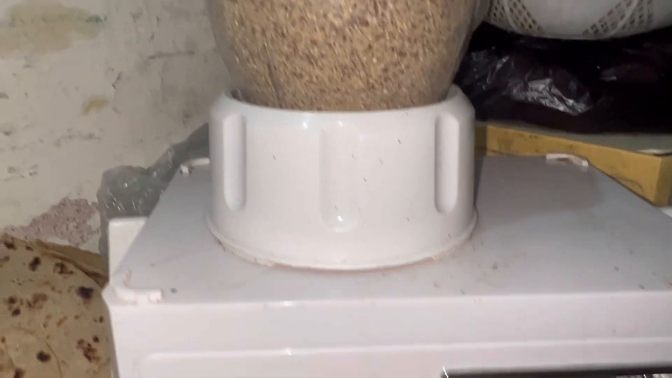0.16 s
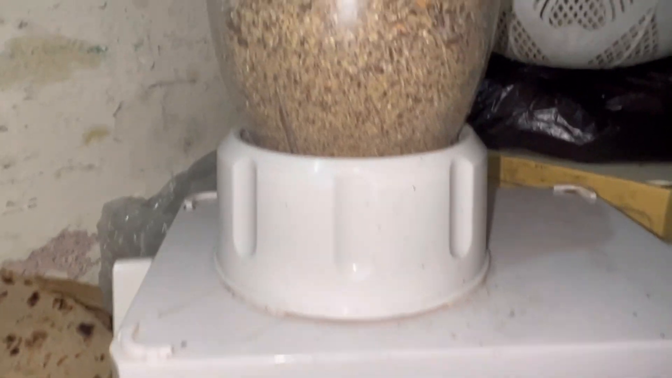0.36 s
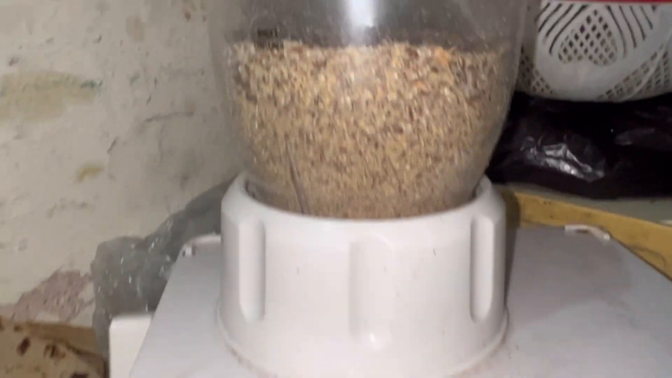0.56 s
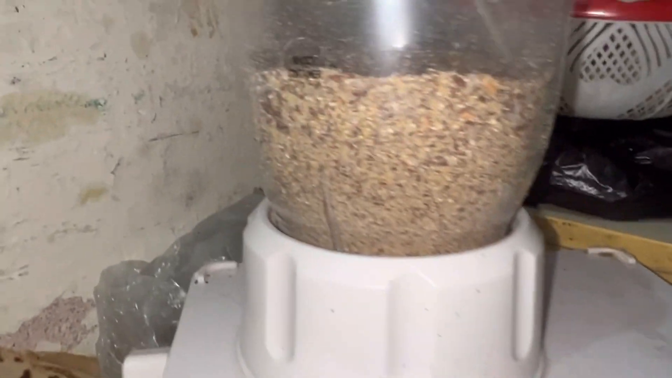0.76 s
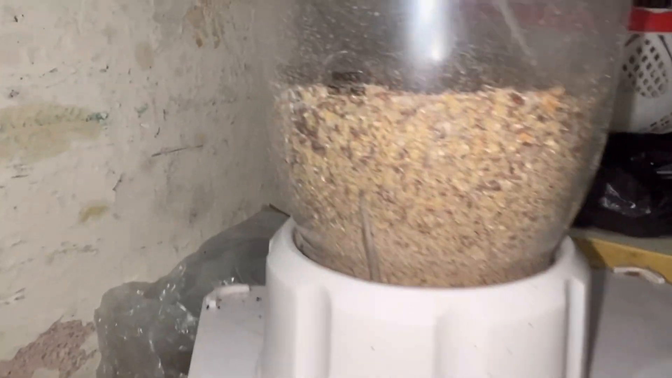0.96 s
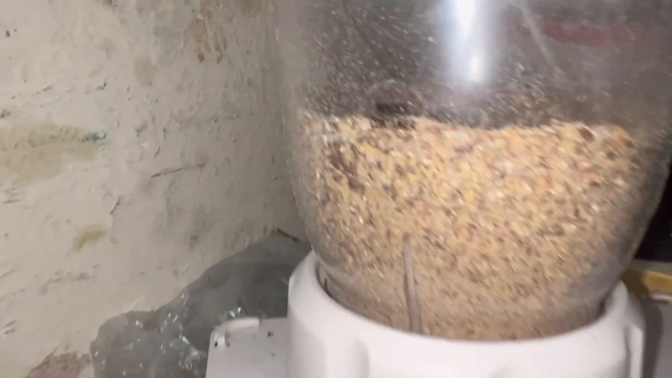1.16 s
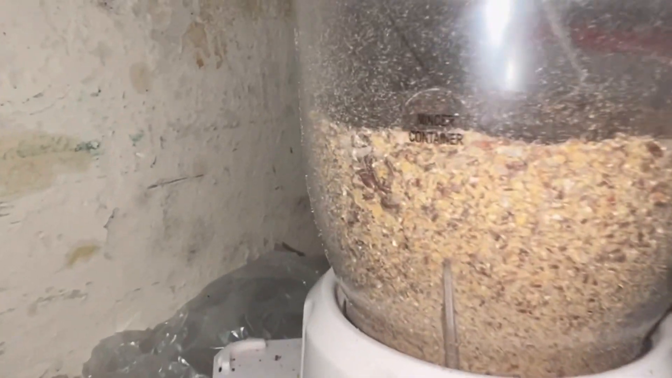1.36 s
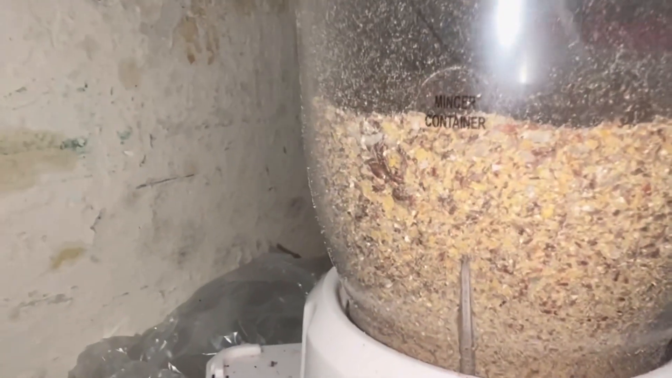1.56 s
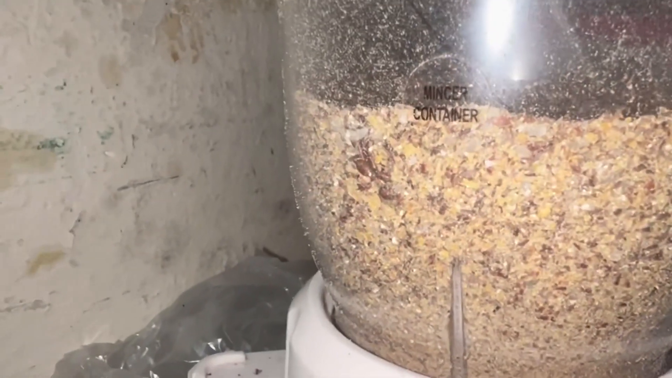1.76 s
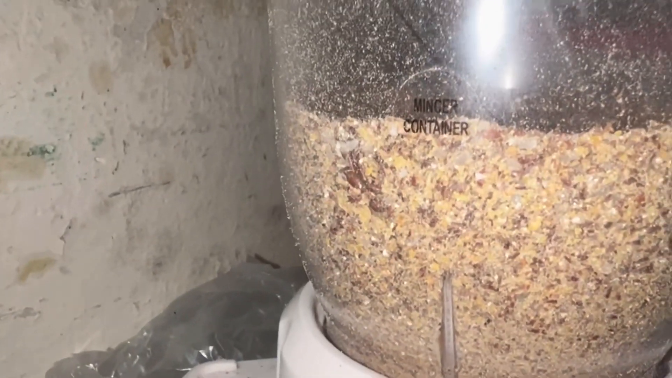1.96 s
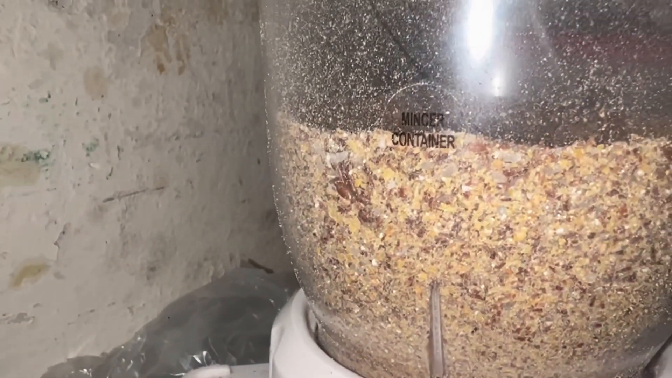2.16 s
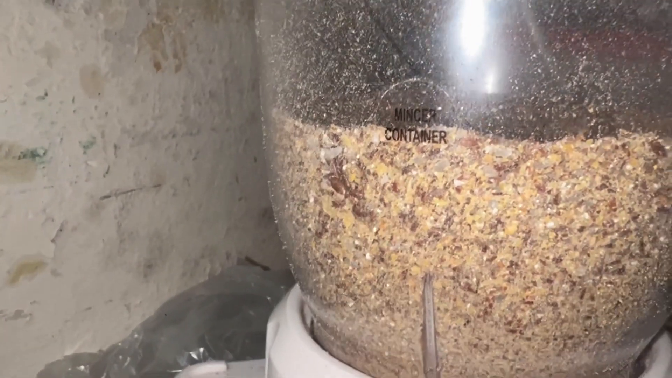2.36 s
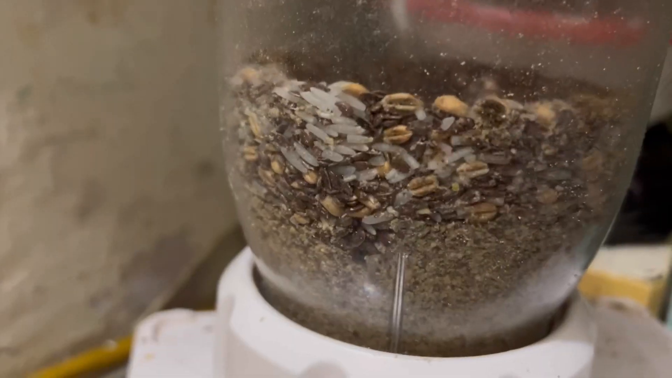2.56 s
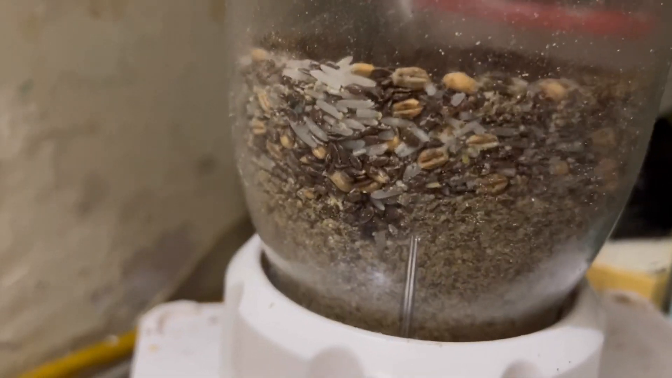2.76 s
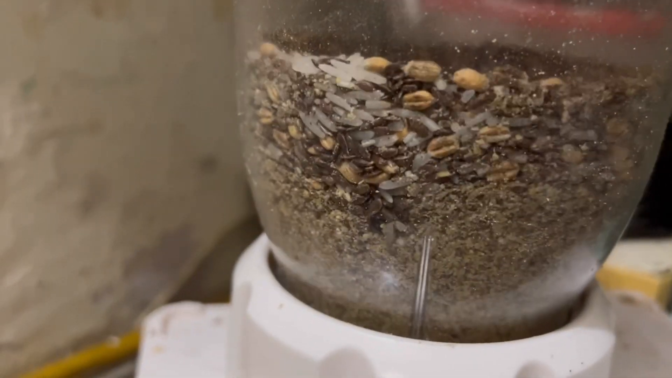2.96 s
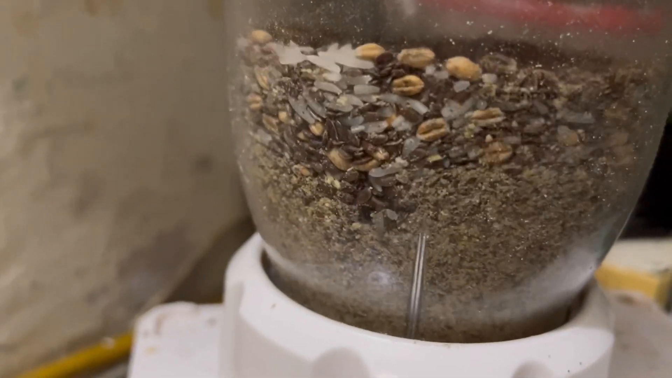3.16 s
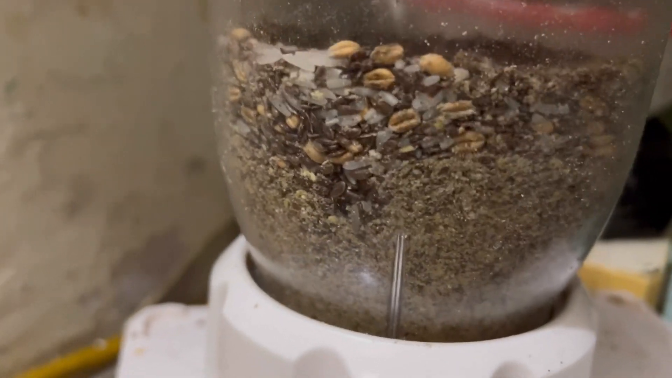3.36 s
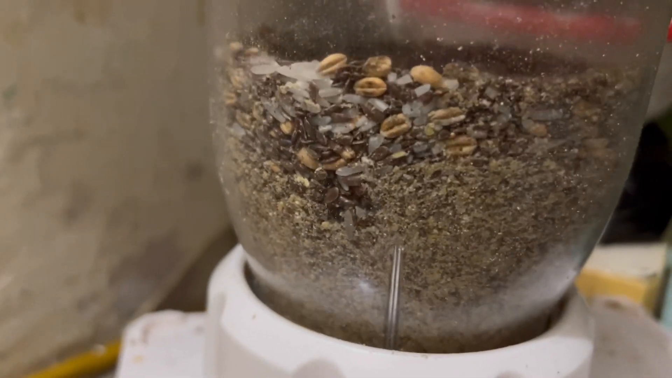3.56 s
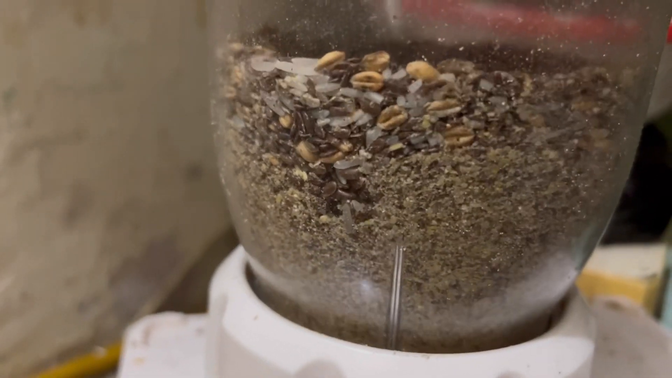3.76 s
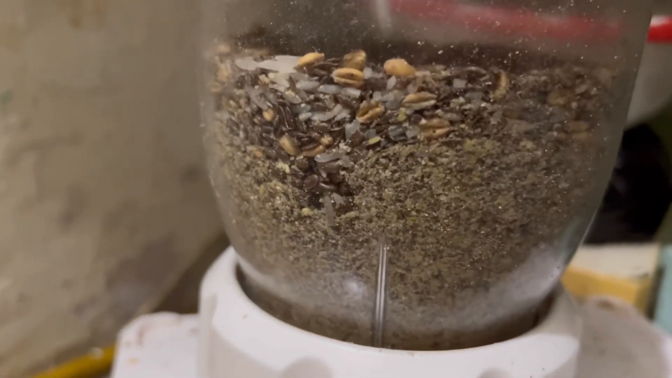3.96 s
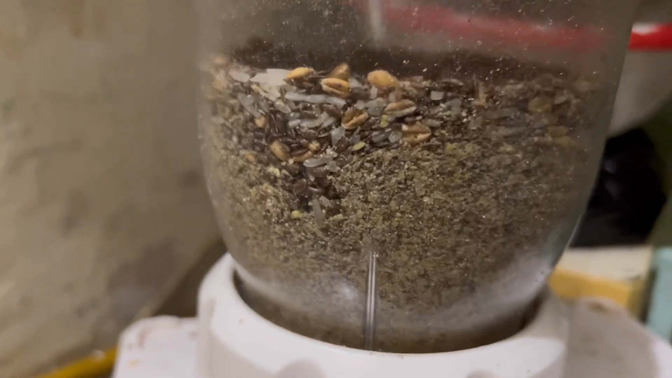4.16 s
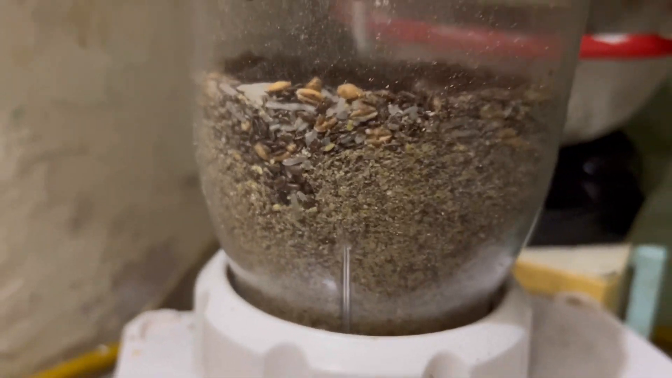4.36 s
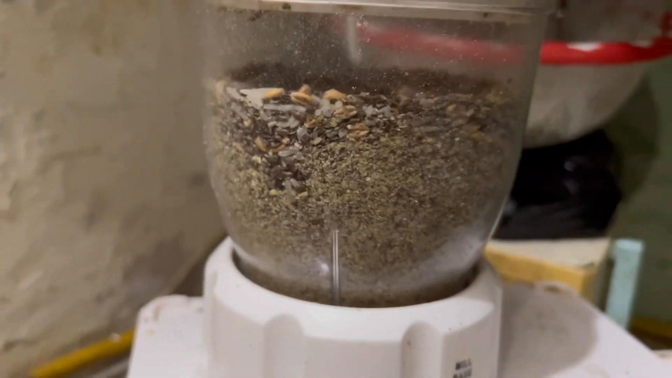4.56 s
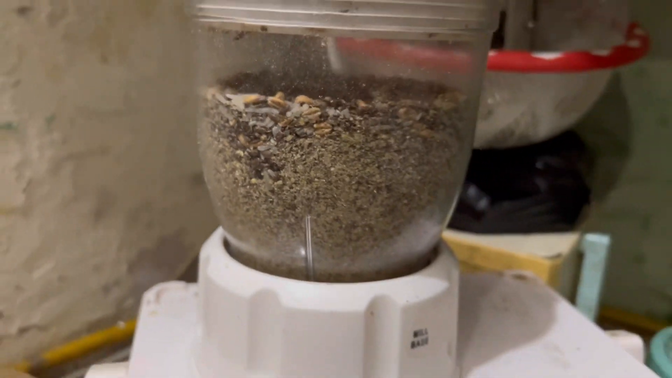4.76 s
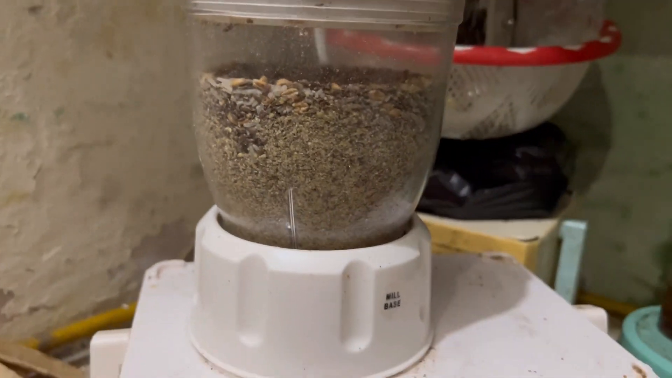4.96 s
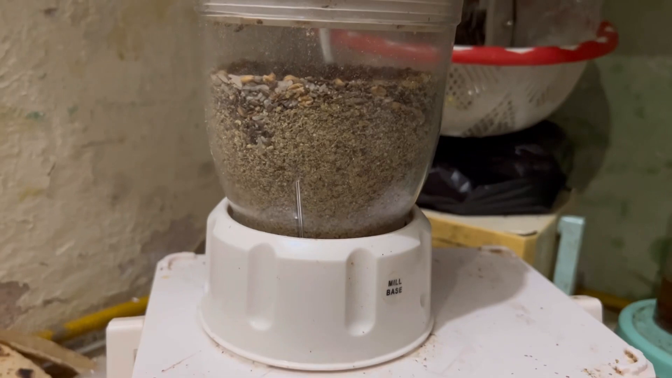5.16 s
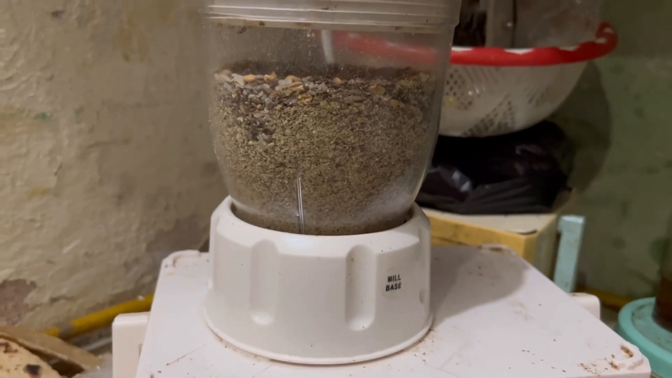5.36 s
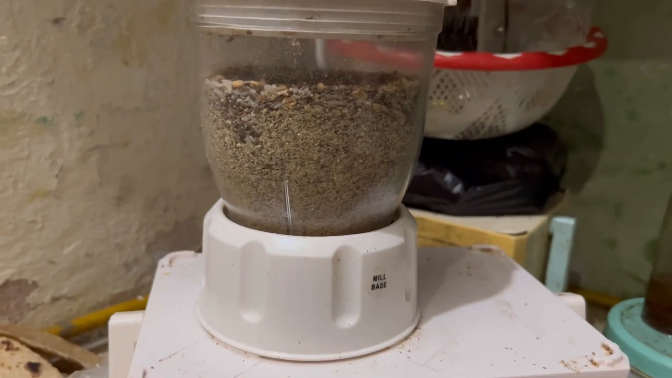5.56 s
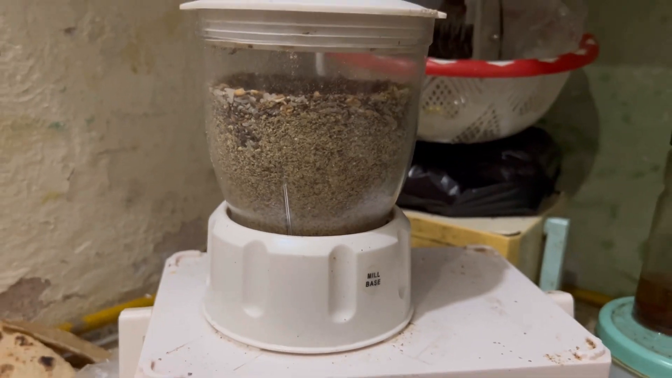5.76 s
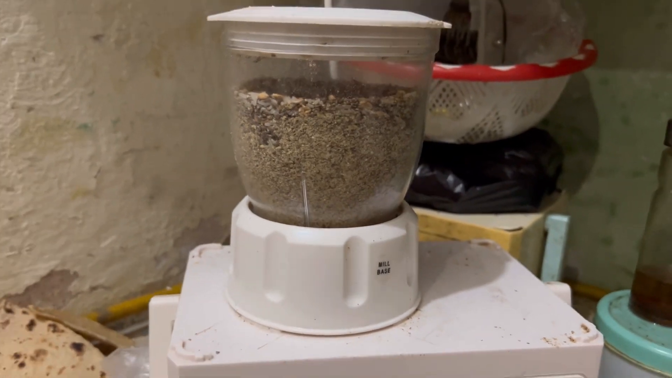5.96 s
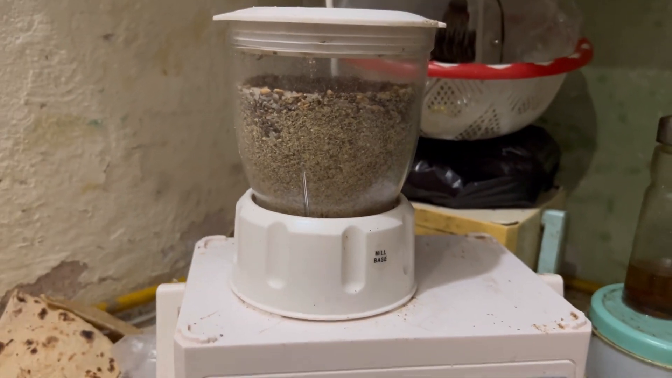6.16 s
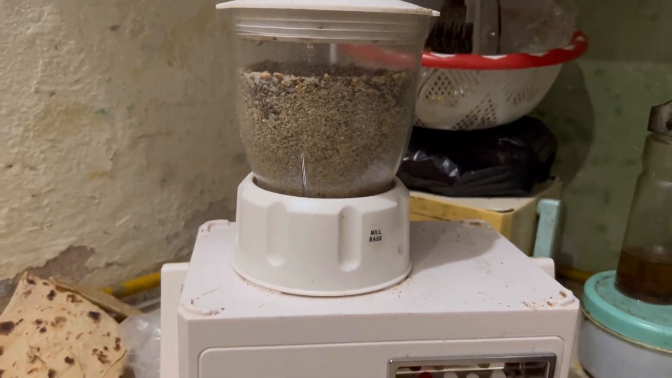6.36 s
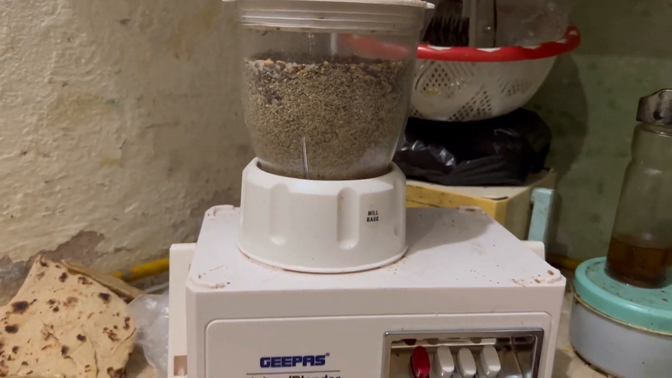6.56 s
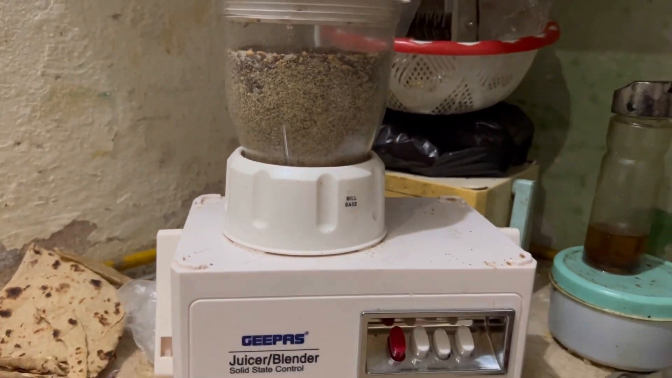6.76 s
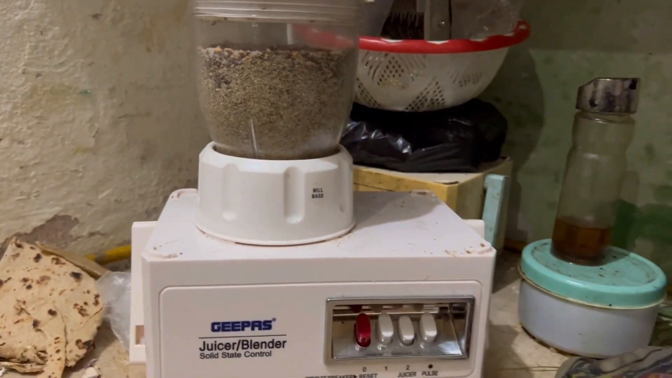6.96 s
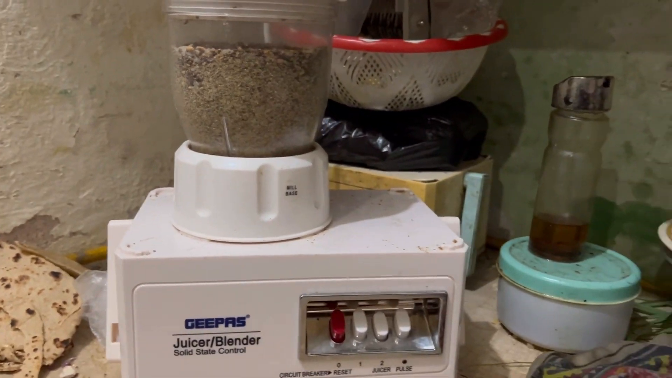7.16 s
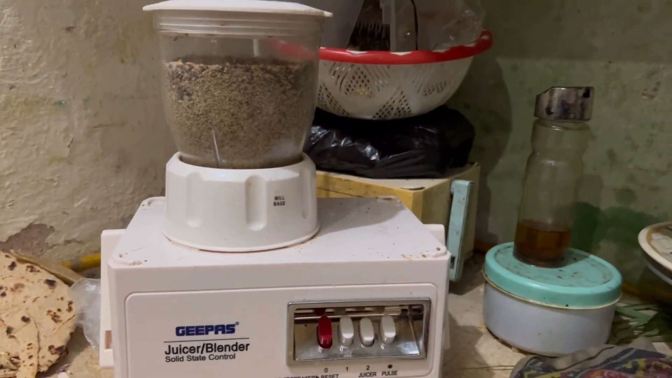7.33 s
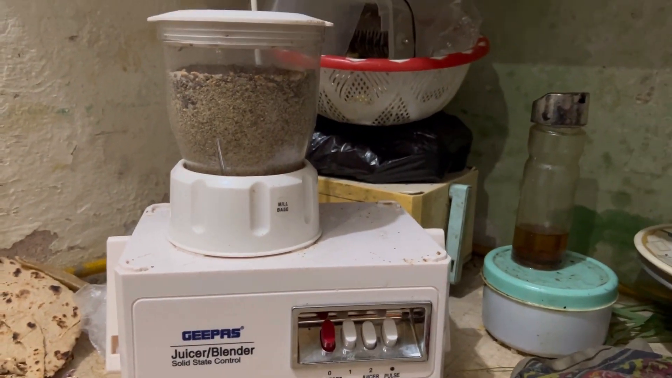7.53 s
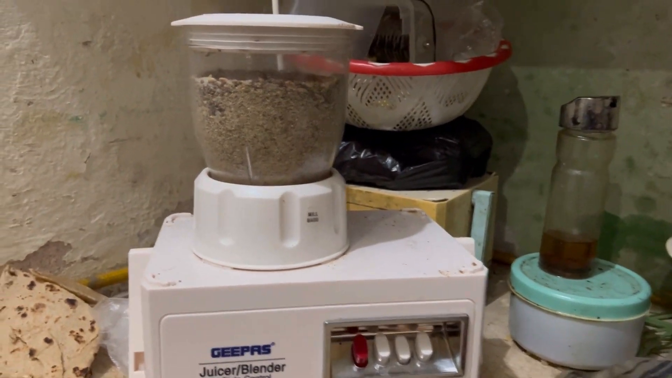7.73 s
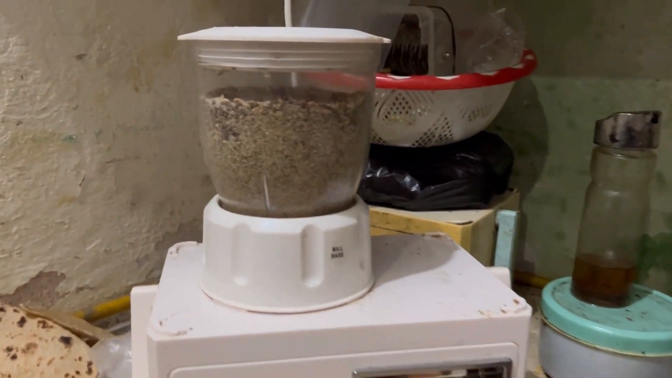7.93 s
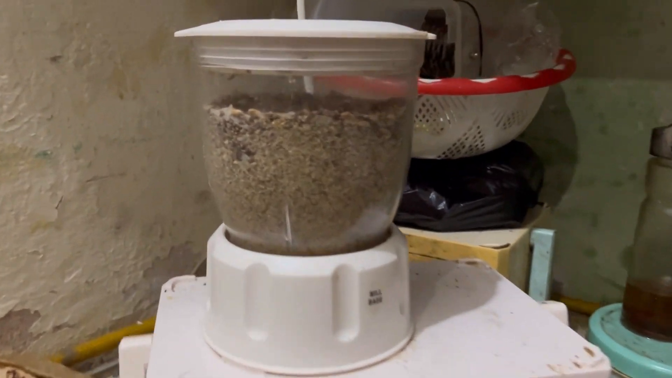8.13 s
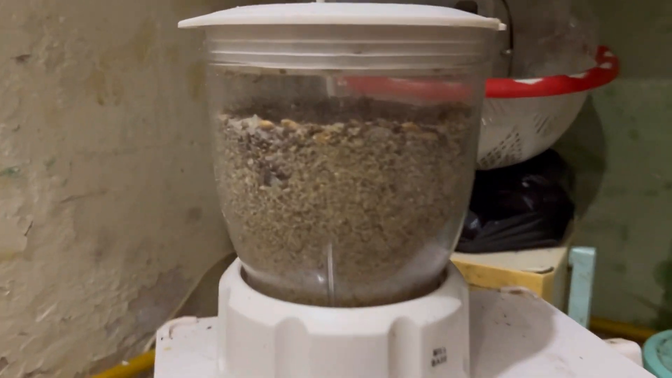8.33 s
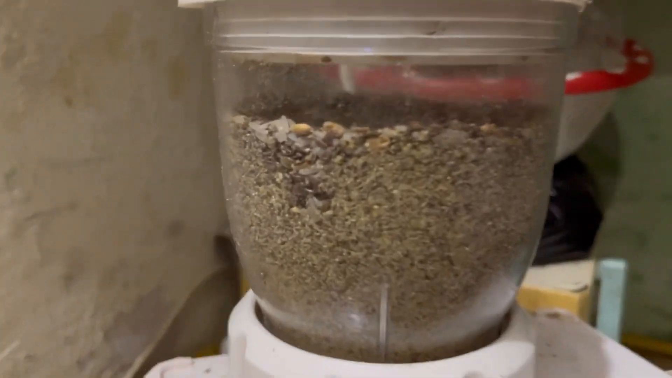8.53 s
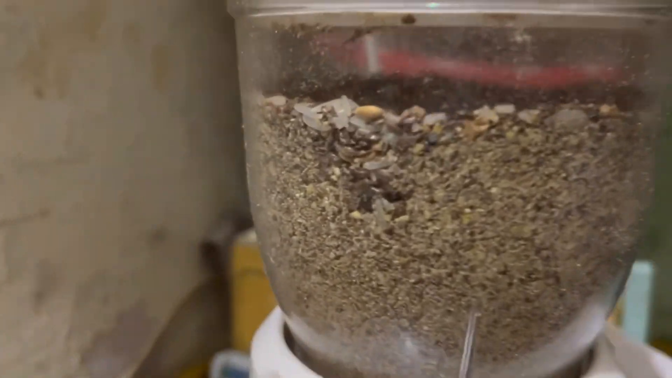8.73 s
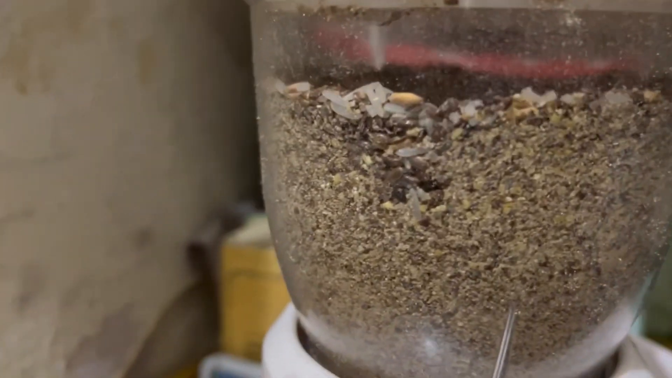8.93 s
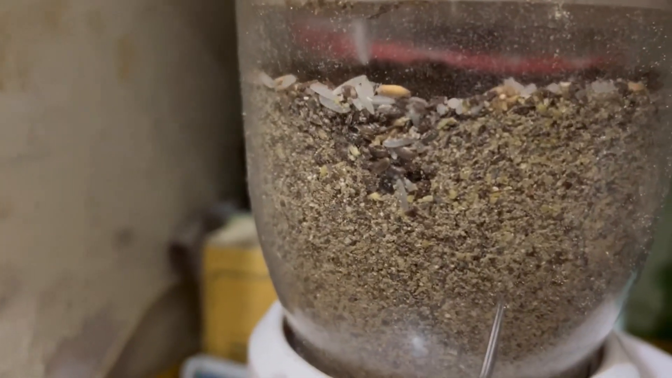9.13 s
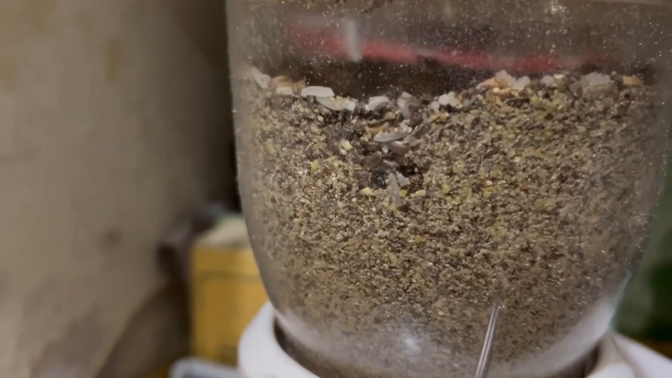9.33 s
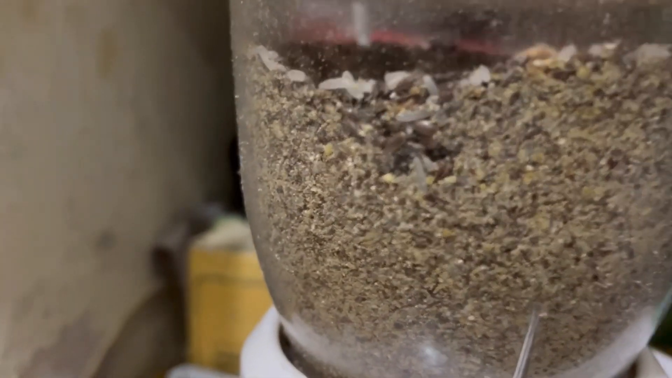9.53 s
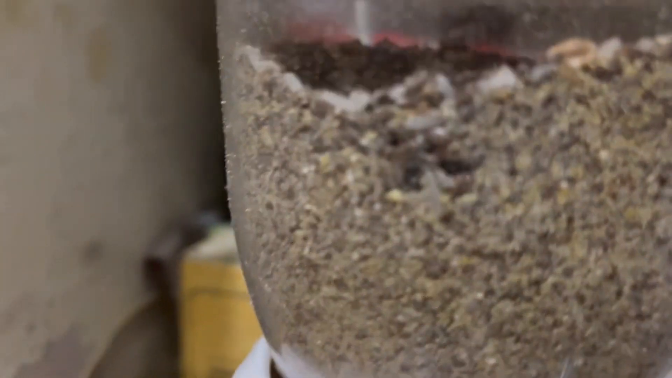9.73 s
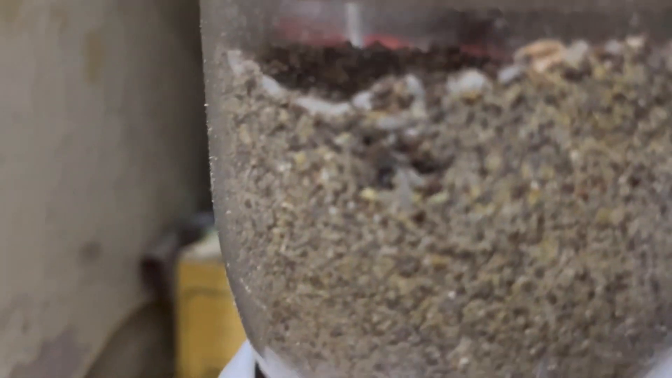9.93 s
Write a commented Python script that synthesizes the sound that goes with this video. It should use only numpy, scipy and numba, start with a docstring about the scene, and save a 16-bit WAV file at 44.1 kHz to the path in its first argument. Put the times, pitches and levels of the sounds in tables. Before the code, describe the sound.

Dry grain rattles and knocks in a labouring grinder's plastic jar, suddenly changing to lighter, hissing grinding over a higher motor hum.

```python
"""Kitchen grinder milling grain

Dry grain rattles in a plastic jar and makes it ring, while the shaft and the motor's iron hum.
A heavy load holds the motor slow and makes the blade knock. After an abrupt change, a lighter
load of seeds hisses over a much faster motor. The microphone drifts away and back in a small kitchen."""
import sys
import numpy as np
from scipy import signal
from scipy.fft import rfft, irfft, next_fast_len
from scipy.io import wavfile
from scipy.ndimage import uniform_filter1d
from numba import njit

SR = 44100
rng = np.random.default_rng(int(sys.argv[2]) if len(sys.argv) > 2 else 0)


def put_to_file(sound):
    """Save the sound as 16-bit audio at rate SR, in the file named by the first command-line argument."""
    columns = np.atleast_2d(sound).T  # one column per channel
    safe = np.clip(columns, -1, 1)
    whole_steps = np.round(safe * 32767)
    wavfile.write(sys.argv[1], SR, whole_steps.astype(np.int16))


N = 440554
T = np.arange(N) / SR
CLOSE_M = 0.15  # the distance that counts as close to the jar

# wall echoes against the direct sound: f/Hz, level with heavy load/dB, level with light load/dB
WALL_ECHOES = [(60, -4, -32), (350, -12, -4.5), (690, -21, -18), (1300, -1.5, -9.5), (1840, -4.5, -8),
               (2880, -5, -0.5), (4600, -4.5, -7.5), (5700, -4.5, -3), (8050, -11.5, -7.5),
               (10200, 9, -2.5), (10870, 4, -1), (12100, -9, -29), (16000, 8, -4.5)]


def amp(db):
    """Turn decibels into a gain."""
    return 10 ** (np.asarray(db) / 20)


def unit(x):
    """Scale a signal to an average power of 1."""
    return x / np.sqrt(np.mean(x ** 2))


def steady(x, size=16000):
    """Even out level changes slower than about size samples."""
    return x / np.sqrt(uniform_filter1d(x ** 2, size=size))


def curve(table):
    """Join (time, value) points with straight lines."""
    return np.interp(T, *np.transpose(table))


def walk(per_s):
    """A smooth random wander with a typical size of 1."""
    step = max(int(SR / per_s), 1)
    held = np.repeat(rng.standard_normal(N // step + 1), step)[:N]
    return unit(uniform_filter1d(uniform_filter1d(held, step), step))


def colour(x, points):
    """Shape the tone along (f/Hz, gain/dB) points."""
    size = next_fast_len(N)
    hz, db = np.transpose(points)
    f = np.maximum(np.fft.rfftfreq(size, 1 / SR), 1)
    gain = amp(np.interp(np.log(f), np.log(hz), db))
    return irfft(rfft(x, size) * gain, size)[:N]


def split(x):
    """Part a sound into its body (below 4000 Hz) and its hiss (above)."""
    body = signal.sosfiltfilt(signal.butter(4, 4000, fs=SR, output="sos"), x)
    return body, x - body


@njit
def resonate(x, hz, width):
    """One resonance whose centre may move, with gain 1 at the centre."""
    y, band, low = np.empty(len(x)), 0., 0.
    for i in range(len(x)):
        g = np.tan(np.pi * hz[i] / SR)
        damping = np.pi * width / SR * (1 + g * g) / g
        v = (band + g * (x[i] - low)) / (1 + g * (g + damping))
        band, low, y[i] = 2 * v - band, low + 2 * g * v, damping * v
    return y


def ring(x, hz, width_hz):
    """Let a sound ring at a fixed or moving pitch."""
    return resonate(x, hz + np.zeros(N), float(width_hz))


def away(metres, far_m):
    """Distance as a share, from 0 close to the jar to 1 at far_m."""
    return np.clip((metres - CLOSE_M) / (far_m - CLOSE_M), 0, 1)


def gain_at(metres, close_db, fall_db):
    """A sound loses fall_db each time the distance doubles."""
    return amp(close_db - fall_db * np.log2(metres / CLOSE_M))


def ports(x, lag_s):
    """Sound reaches the microphone's right opening a little before the left."""
    return np.array([np.interp(T - lag_s, T, x), x])


def kitchen(x, tone, t60_s):
    """Close, hard walls add short echoes that differ between left and right."""
    t = T[:SR // 4]
    onset = np.minimum(t / 0.0069, 1) ** 2
    tail = rng.standard_normal(len(t)) * amp(-60 * t / t60_s) * onset
    echoes = signal.fftconvolve(x, tail / np.linalg.norm(tail))[:N]
    side = colour(echoes, tone)
    return np.array([x + side, x - side])


def bounces(x, metres, echo_db, count):
    """Faint echoes off the counter and walls slide against the direct sound as the microphone moves."""
    paths = rng.random((count, 2))
    delays_s = np.interp(paths[:, 0], [0, 1], [.0025, .009])
    slopes = np.cos(np.pi * paths[:, 1]) / 343  # extra delay in seconds per metre moved
    echoes = sum(np.interp(T - delay - slope * metres, T, x) for delay, slope in zip(delays_s, slopes))
    return x + amp(echo_db) * echoes


def hollow(x, metres):
    """Echoes off the housing cancel or lift bands that slide up as the microphone backs away."""
    # bands: close f/Hz, far f/Hz, width/Hz, close gain/dB, far gain/dB
    bands = [(1480, 1780, 90, -1.0, -5.5), (2100, 2450, 240, 0.0, 3.0), (2410, 3010, 470, -2.0, -15.0),
             (2650, 3370, 280, 1.0, -10.0), (3110, 4070, 330, -2.5, -1.5)]
    far = away(metres, far_m=0.45) ** 1.7
    for near_hz, far_hz, width_hz, near_db, far_db in bands:
        db = near_db + (far_db - near_db) * far ** 3
        x = x + (amp(db) - 1) * ring(x, near_hz + (far_hz - near_hz) * far, width_hz)
    return x


def mains_hum(tones, flutter_db):
    """The motor's iron hums at even multiples of the mains frequency."""
    return sum(np.sqrt(2) * amp(db + flutter_db * walk(4)) * np.sin(2 * np.pi * hz * T)
               for hz, db in tones)


def shaft_angle(hz, wobble):
    """How far the shaft has turned; the uneven load makes its speed wobble."""
    return 2 * np.pi * np.cumsum(hz * (1 + wobble * walk(24.97))) / SR


def shaft_hum(angle, harmonics, flutter_db):
    """The unbalanced blade shakes the housing; higher harmonics flutter more."""
    out = 0
    for multiple, db in harmonics:
        gain = amp(db + flutter_db * np.sqrt(multiple) * walk(12))
        out = out + gain * np.sin(multiple * angle + rng.uniform(0, 2 * np.pi))
    return np.sqrt(2) * out


def whine(rubbing):
    """Meal rubbing on the wall keeps a few notes of the jar singing; they waver and flutter."""
    # notes: start/s, fade/s, end/s, f/Hz, width/Hz, waver/share of f, flutter/dB, level/dB
    notes = [(-0.083, 0.22, 0.55, 2810, 160, .002, 0, -34), (0.47, .08, 0.88, 995, 78, .003, 1.5, -33.5),
             (0.68, 0.4, 2.5, 1822, 120, .003, 4.5, -36), (-.1, .1, 3, 5310, 330, .006, 1, -37.5)]
    out = 0
    for start_s, fade_s, end_s, hz, width_hz, waver, flutter_db, db in notes:
        centre = hz * (1 + waver * walk(30))
        note = ring(ring(rubbing, centre, width_hz), centre, width_hz)
        fade = np.clip(np.minimum(T - start_s, end_s - T) / fade_s, 0, 1)
        out = out + steady(note, size=2400) * amp(db + flutter_db * walk(60.16)) * fade
    return out


def knocking(angle, scatter, bout_db, bouts_per_s):
    """The loaded blade knocks once a turn, unevenly and in bouts, and rings the base of the jar."""
    # notes of the base: f/Hz, width/Hz, relative level/dB
    notes = [(912, 80, 0), (972, 70, 0), (1075, 70, -5)]
    # loudness of the knocking: t/s, level/dB
    loudness = [(0, -41), (.65, -32.5), (.95, -35), (1.13, -30.5), (1.4, -34.5), (1.85, -29.8),
                (2.43, -30.3)]
    new_turn = np.diff(np.floor(angle / (2 * np.pi)), prepend=0)
    size = (1 + scatter * rng.standard_normal(N)) * rng.choice([-1, 1], N)
    knocks = new_turn * size * amp(bout_db * np.tanh(walk(bouts_per_s)))
    base = sum(amp(db) * ring(ring(knocks, hz, width), hz, width) for hz, width, db in notes)
    return steady(base) * amp(curve(loudness))


def swell(x):
    """Single notes of the jar rise and sink as the load shifts or the microphone moves."""
    # swells: peak t/s, half length/s, f/Hz, width/Hz, boost/dB
    swells = [(4.51, 0.17, 4650, 250, 5.0), (4.89, 0.45, 5720, 170, 5.0), (5.89, 0.51, 6220, 140, 4.0),
              (6.43, 0.22, 1750, 70, 7.5), (7.3, 0.47, 5530, 190, 8.0), (7.31, 0.57, 3730, 170, 6.5),
              (7.43, 0.4, 8760, 390, 5.5), (8.31, 0.29, 11110, 250, 3.5), (8.44, 0.23, 5660, 210, 6.5),
              (8.63, 0.1, 2740, 170, 4.5), (9.06, 0.26, 5870, 160, 4.0), (9.85, 0.45, 1830, 160, 3.0)]
    for peak_s, half_s, hz, width_hz, db in swells:
        bump = np.exp(-((T - peak_s) / half_s) ** 2)
        x = x + (amp(db) - 1) * bump * ring(x, hz, width_hz)
    return x


def cracks(decay_s):
    """Hard kernels break on the blade: two gains, for body and hiss, that jump and fall back."""
    # breaking kernels: t/s, body boost/dB, hiss boost/dB
    kernels = [(.684, 4, 0), (1.481, 6, 3), (1.569, 11, 6.5), (2.323, 3, 4.5), (2.473, 4, 6.5),
               (2.602, 1, 6), (2.994, 3, 3), (3.242, 2, 6), (4.236, 7, 4), (5.029, 3.5, 2), (7.265, -1, 3),
               (8.452, 4, 3), (9.031, 8.5, 1), (9.647, 4, 5)]
    kicks = np.zeros((2, N))
    for at_s, body_db, hiss_db in kernels:
        kicks[:, int(at_s * SR)] += amp([body_db, hiss_db]) - 1
    return 1 + signal.lfilter([1], [1, -np.exp(-1 / (decay_s * SR))], kicks)


def impacts(angle, per_s, spread_db, turn_depth, blade_depth, clump_db):
    """Dense, uneven grain hits grow stronger once a turn, at both blade wings and in clumps."""
    hit = rng.random(N) < per_s / SR
    size = amp(spread_db * np.minimum(rng.exponential(size=N), 4)) * rng.choice([-1, 1], N)
    sweep = 1 + turn_depth * np.sin(angle) + blade_depth * np.sin(2 * angle)
    clumps = amp(clump_db * (walk(110) + .5 * walk(25)))
    return unit(hit * size * sweep * clumps)


def jar(coarse, fine, tone, notes, far, rattle_db, beaming):
    """Coarse pieces ring the jar's low notes, fine meal the high ones; each spreads its own way."""
    body_burst, hiss_burst = cracks(decay_s=0.0077)
    out = colour(split(coarse)[0] * body_burst + split(fine)[1] * hiss_burst, tone)
    for hz, far_hz, width_hz, near_db, far_db in notes:
        # with beaming, high notes leave in narrow beams and change first as the microphone moves
        shift = far ** np.clip((3320 / hz) ** beaming, .5, 2.4)
        db = near_db + (far_db - near_db) * shift
        if hz < 1100:
            db = db + rattle_db * walk(45)  # low notes swell as the load tumbles
        out = out + (amp(db) - 1) * ring(out, hz + (far_hz - hz) * far, width_hz)
    return out


def grinding(sound, body_gain, hiss_gain):
    """The body and the hiss of the grinding each have their own level."""
    body, hiss = split(sound)
    return steady(body) * body_gain + steady(hiss) * hiss_gain


def heavy_load(metres):
    """A slow, labouring motor hums strongly under rattling grain."""
    # shaft slowly freeing itself: t/s, speed/Hz
    speed = [(0.03, 177.4), (0.63, 176.4), (0.71, 179.6), (2.42, 180.7)]
    # shaft hum: multiple of the speed, relative level/dB
    harmonics = [(1, 0), (2, -27), (3, -10.5), (4, -18.5), (5, -9), (6, -20)]
    # magnetic hum: f/Hz, level/dB
    iron_tones = [(100, -47), (200, -67)]
    # overall tone of the grinding: f/Hz, gain/dB
    tone = [(25, -39), (60, -15), (120, -6), (240, -7.5), (450, -5.5), (1200, -1.5), (2400, 0), (4000, 2.5),
            (7000, 3), (9000, -0.5), (13000, -9.5), (16000, -6.5)]
    # jar resonances: f/Hz, width/Hz, close gain/dB, far gain/dB
    jar_notes = [(340, 50, 13, 13), (705, 45, 5, 7), (945, 70, 5.5, 5.5), (1070, 80, 5, 6),
                 (1230, 120, -3, -1), (1440, 110, 5, 6), (1690, 120, 1, -3), (1830, 70, 4, 0),
                 (2280, 180, -4, -1.5), (2810, 90, 4, 5), (3090, 130, 6, 4), (3240, 160, 0, -7),
                 (3750, 400, -3, -1), (4800, 250, 2.5, 2), (5320, 280, 4.5, 7), (7700, 260, 7.5, 0),
                 (8350, 500, 2.5, 3.5), (9150, 600, 4, 1), (11600, 900, 11.5, 8), (15200, 700, 4, 0)]
    far = away(metres, far_m=0.21) ** 2
    angle = shaft_angle(curve(speed), wobble=0.0021)
    coarse = impacts(angle, 11000, spread_db=2.0, turn_depth=0.081, blade_depth=0.036, clump_db=0.77)
    fine = impacts(angle, 14000, spread_db=2.5, turn_depth=0.098, blade_depth=0.13, clump_db=0.84)
    notes = [(hz, hz, width, near_db, far_db) for hz, width, near_db, far_db in jar_notes]
    ringing = jar(coarse, fine, tone, notes, far, rattle_db=2.1, beaming=0)
    grain = grinding(ringing, gain_at(metres, -25, fall_db=3.5), gain_at(metres, -29.5, fall_db=3))
    grain = grain + whine(coarse) + knocking(angle, scatter=0.41, bout_db=7.0, bouts_per_s=50)
    motor = gain_at(metres, -27, fall_db=4.5) * shaft_hum(angle, harmonics, flutter_db=-1.0)
    iron = mains_hum(iron_tones, flutter_db=-1.2)
    walls = [(hz, db) for hz, db, _ in WALL_ECHOES]
    return kitchen(grain, walls, t60_s=0.07) + ports(motor + iron, lag_s=0.00022)


def light_load(metres):
    """A fast motor hums thinly under hissing seeds."""
    # shaft surging as the seeds slip and sagging as they catch: t/s, speed/Hz
    speed = [(2.47, 291.5), (4.25, 291), (5.4, 288.5), (5.81, 284.8), (6.46, 292), (7.0, 310.5), (7.2, 302),
             (7.65, 292.5), (8.1, 297.5), (8.35, 294), (8.57, 282.5), (8.85, 278.5), (9.3, 282), (9.6, 278),
             (9.97, 281)]
    # shaft hum: multiple of the speed, relative level/dB
    harmonics = [(1, 1.5), (2, -12.5), (5, -7)]
    # loudness of the shaft hum: t/s, level/dB
    hum_level = [(2.47, -41), (3.9, -43.5), (5, -45.5), (6.2, -47.5), (7, -42.5), (7.45, -45.5), (8, -43),
                 (8.8, -39), (9.3, -40.5), (9.95, -40)]
    # magnetic hum, close in front: f/Hz, level/dB
    iron_tones = [(100, -81), (200, -49), (300, -56)]
    # overall tone of the grinding: f/Hz, gain/dB
    tone = [(25.0, -44.0), (60.0, -27), (110.0, -28.5), (170.0, -6.5), (350.0, -6), (520.0, -1.5),
            (1000.0, -2.5), (2200.0, 0.5), (3200.0, 2), (4500.0, 6), (7000.0, 1.5), (11000.0, 1),
            (13900.0, -1.5), (16000.0, -1)]
    # jar resonances, negative where its walls cancel the sound:
    # close f/Hz, far f/Hz, width/Hz, close front gain/dB, far gain/dB, close side gain/dB
    jar_notes = [(395, 390, 60, 1.0, 4.5, 1.5), (575, 545, 80, 2.0, 4.5, 2.5),
                 (710, 720, 100, 9.0, 7.0, 10.0), (850, 850, 130, -7.5, -8.0, -7.0),
                 (995, 1035, 120, -1.0, 1.5, -2.0), (1315, 1290, 125, 9.5, 11.5, 9.0),
                 (1445, 1430, 90, 6.0, 8.5, 7.0), (1505, 1600, 80, -5.5, -6.0, -4.5),
                 (1700, 1735, 80, 8.0, -4.0, 8.0), (1860, 1845, 90, 10.5, -11.0, 11.0),
                 (1985, 1945, 85, 6.5, 8.0, 3.5), (2230, 2315, 150, 4.0, 3.0, 5.5),
                 (2670, 2685, 115, 4.0, 3.5, 3.0), (3600, 3670, 125, 12.0, 0.0, 10.0),
                 (3825, 3920, 185, -7.0, -1.0, -3.0), (4200, 4380, 255, 2.5, -3.0, 0.0),
                 (4875, 4915, 150, -2.0, 3.5, -2.0), (5070, 5135, 280, -7.0, -3.5, -2.5),
                 (5340, 5315, 205, 3.5, 0.0, 6.0), (5560, 5640, 220, 5.5, 2.0, 2.0),
                 (5825, 5870, 195, 1.0, 2.5, 3.0), (6220, 6235, 200, -0.5, 3.0, 1.0),
                 (6575, 6570, 270, 7.5, 2.5, 2.0), (7570, 7490, 355, -1.5, -3.5, 0.5),
                 (7825, 7895, 290, -4.0, 3.5, 3.5), (8765, 8650, 730, -2.0, -6.0, -6.0),
                 (9310, 9325, 240, 6.5, 0.0, 1.0), (9715, 9785, 300, -2.0, 1.0, 2.5),
                 (10495, 10510, 255, -2.0, 8.0, 6.5), (11110, 11115, 290, -0.5, 7.0, -1.0),
                 (12220, 12235, 400, 4.5, 0.0, 1.0), (12645, 12810, 530, 5.0, 0.0, 5.5),
                 (14880, 14900, 400, 2.0, -0.5, 0.0), (15475, 15475, 390, 6.5, 2.0, 8.5)]
    far = away(metres, far_m=0.49)
    turned = np.clip((T - 6.6) / 2.9, 0, 1)  # the microphone comes round to the side of the jar
    angle = shaft_angle(curve(speed), wobble=0.00355)
    coarse = impacts(angle, 18000, spread_db=2.0, turn_depth=0.067, blade_depth=0.12, clump_db=0.95)
    fine = impacts(angle, 22000, spread_db=2.5, turn_depth=0.16, blade_depth=0.08, clump_db=0.92)
    notes = [(hz, far_hz, width, front_db + (side_db - front_db) * turned, far_db)
             for hz, far_hz, width, front_db, far_db, side_db in jar_notes]
    ringing = jar(coarse, fine, tone, notes, far, rattle_db=0.9, beaming=1.37)
    ringing = swell(hollow(ringing, metres))
    ringing = bounces(ringing, metres, echo_db=-24, count=14)
    grain = grinding(ringing, gain_at(metres, -25, fall_db=6), gain_at(metres, -24, fall_db=4.5))
    motor = amp(curve(hum_level)) * shaft_hum(angle, harmonics, flutter_db=0.77)
    iron_db = 2.5 * turned - 6 * far  # louder from the side, weaker a step back
    iron = amp(iron_db) * mains_hum(iron_tones, flutter_db=0)
    walls = [(hz, db) for hz, _, db in WALL_ECHOES]
    return kitchen(grain, walls, t60_s=0.11) + ports(motor + iron, lag_s=0.0002)


def scene():
    """The heavy load gives way to the light one with a very short dip."""
    # the microphone moves in, backs away and returns: t/s, distance from the jar/m
    path = [(0, 0.2), (.45, 0.2), (1.1, 0.18), (1.6, 0.14), (2.5, 0.14), (3.0, 0.17), (3.85, 0.17),
            (5.1, 0.3), (5.9, 0.32), (6.35, 0.38), (7.4, 0.45), (7.9, 0.37), (8.2, 0.24), (8.85, 0.16),
            (9.9, .15)]
    change_s, fade_s = 2.437, 0.013
    metres = curve(path)
    fade_in = np.clip((T - change_s) / fade_s, 0, 1)
    return heavy_load(metres) * (T < change_s) + light_load(metres) * fade_in


def record(dry):
    """The left side is louder than the right, and the highest treble is cut steeply."""
    # left minus right: f/Hz, level/dB
    balance = [(60, 2.3), (200, 3.0), (600, 2.4), (2500, 3), (8000, 2.6), (12000, .3), (16000, .2)]
    left = colour(dry[0], [(hz, db / 2) for hz, db in balance])
    right = colour(dry[1], [(hz, -db / 2) for hz, db in balance])
    treble_cut = signal.ellip(10, .2, 80, 15750, fs=SR, output="sos")
    return signal.sosfilt(treble_cut, [left, right])


dry = scene()
out = record(dry)
put_to_file(out)
```